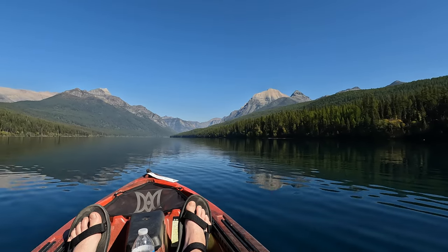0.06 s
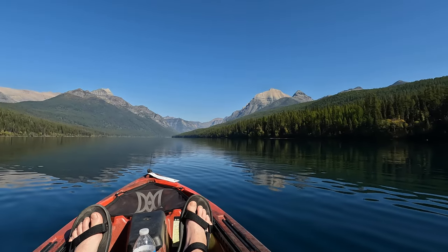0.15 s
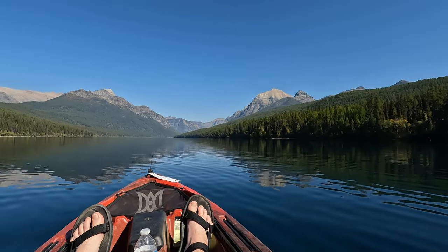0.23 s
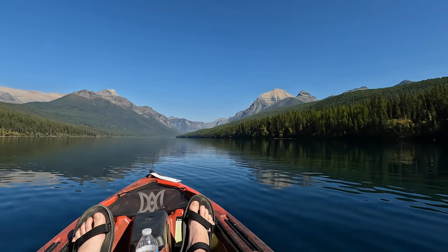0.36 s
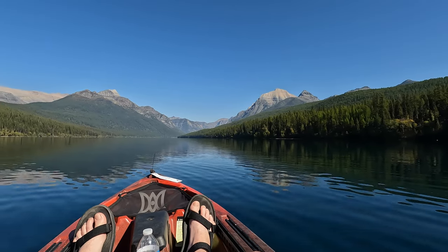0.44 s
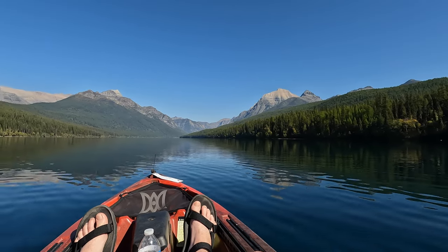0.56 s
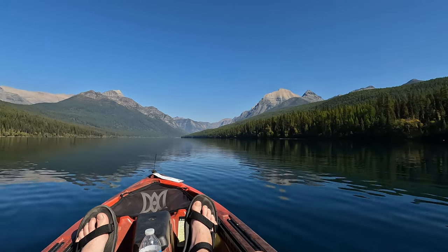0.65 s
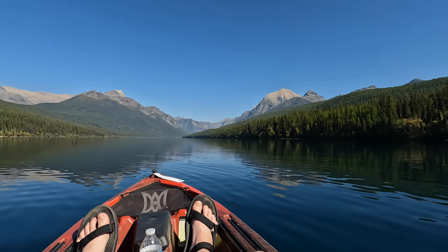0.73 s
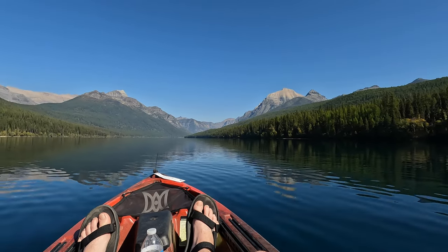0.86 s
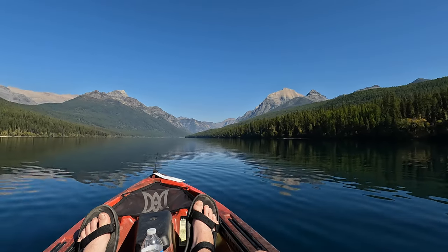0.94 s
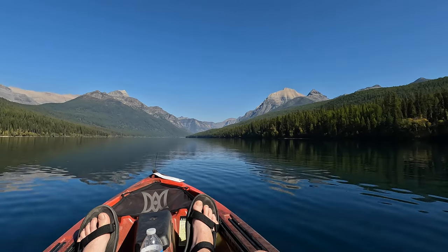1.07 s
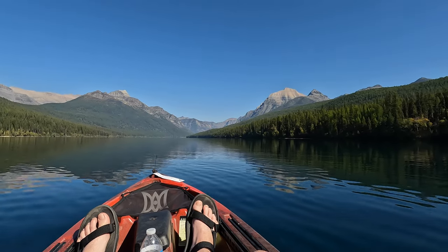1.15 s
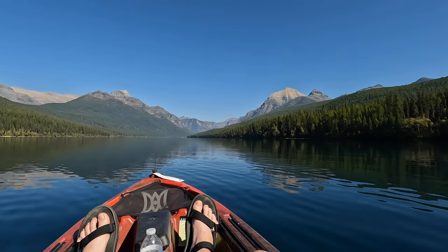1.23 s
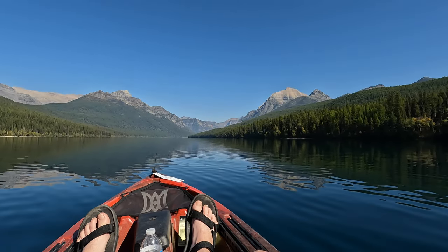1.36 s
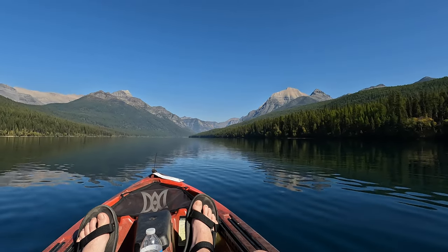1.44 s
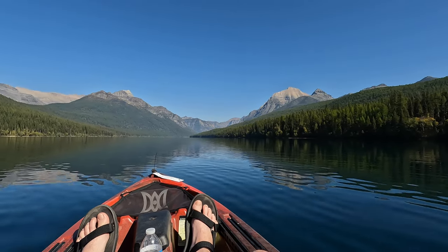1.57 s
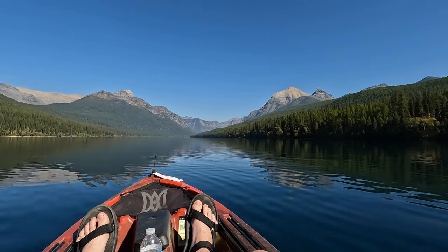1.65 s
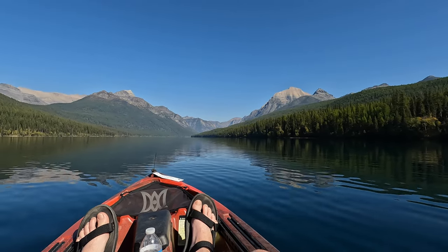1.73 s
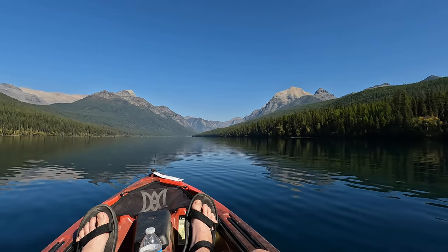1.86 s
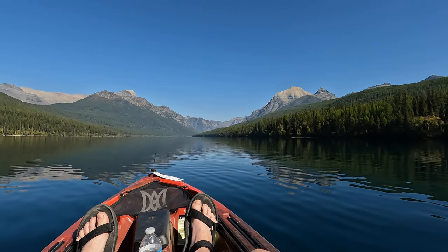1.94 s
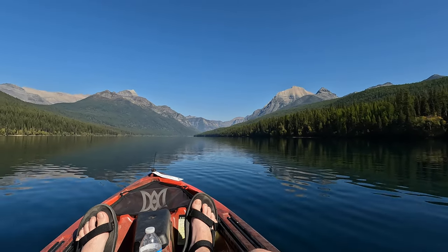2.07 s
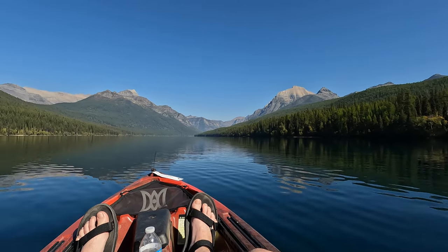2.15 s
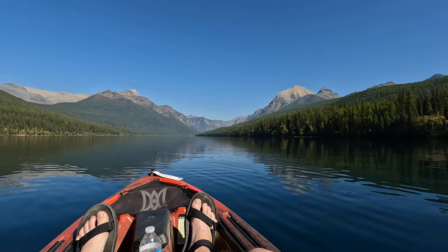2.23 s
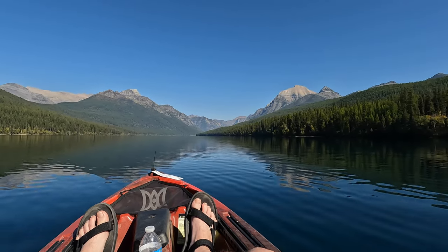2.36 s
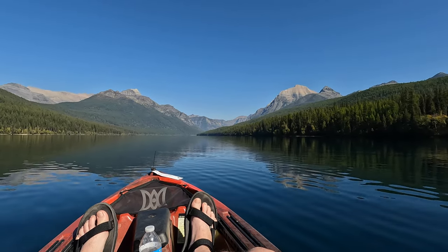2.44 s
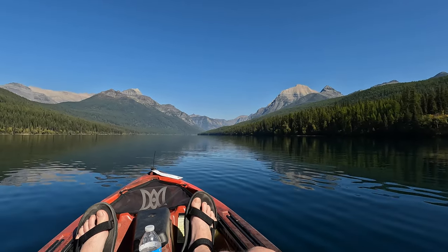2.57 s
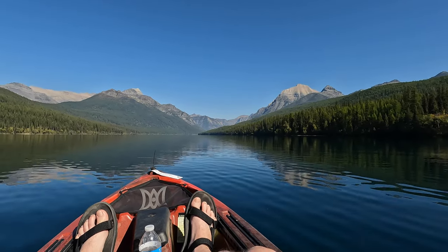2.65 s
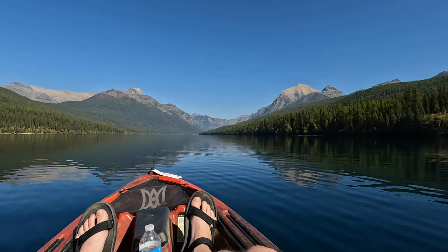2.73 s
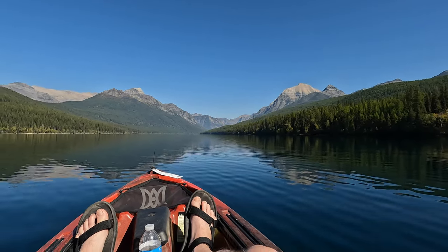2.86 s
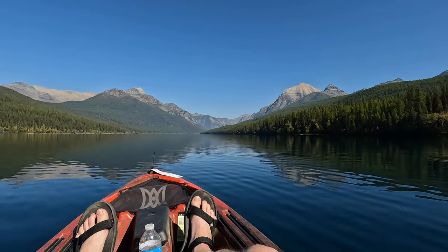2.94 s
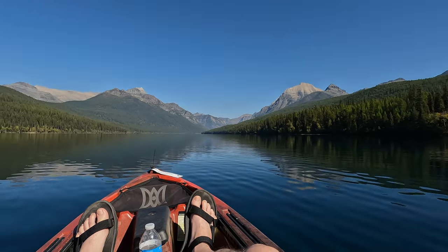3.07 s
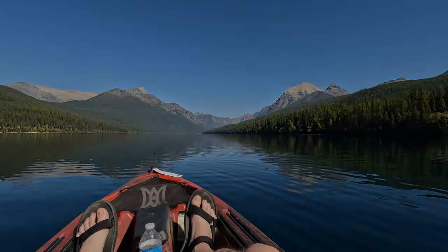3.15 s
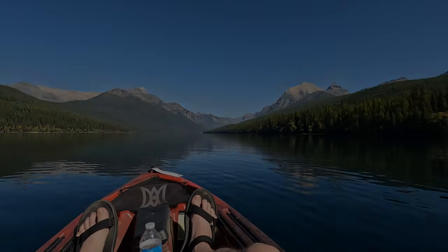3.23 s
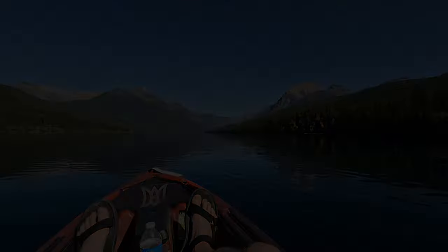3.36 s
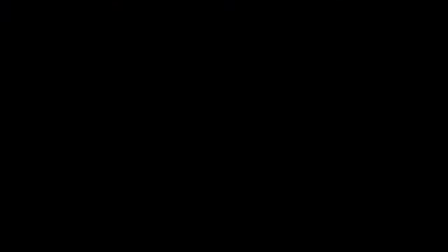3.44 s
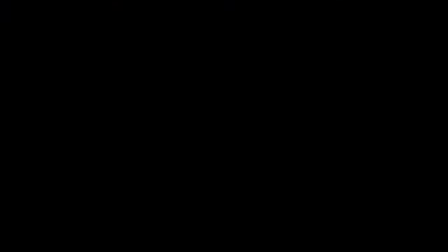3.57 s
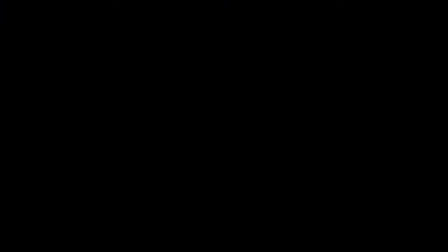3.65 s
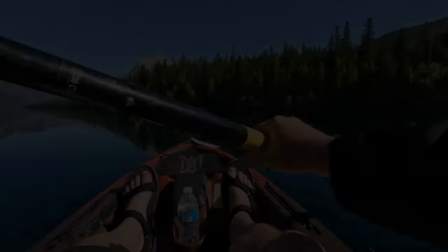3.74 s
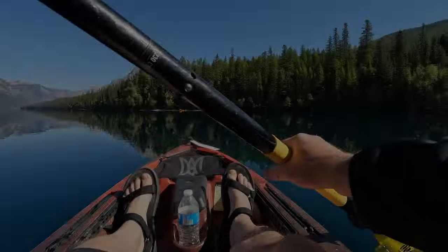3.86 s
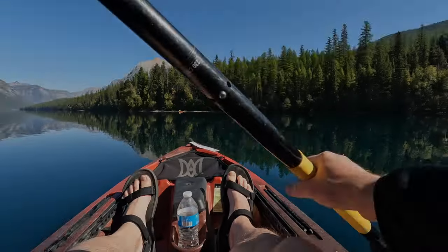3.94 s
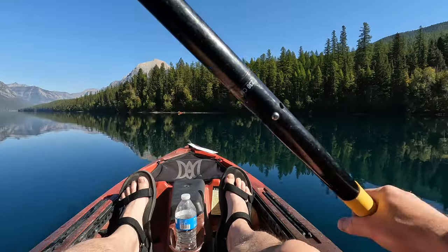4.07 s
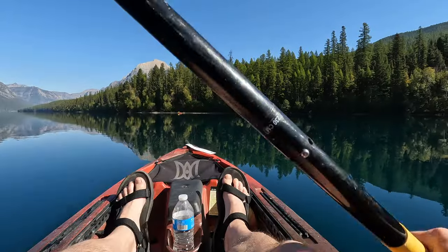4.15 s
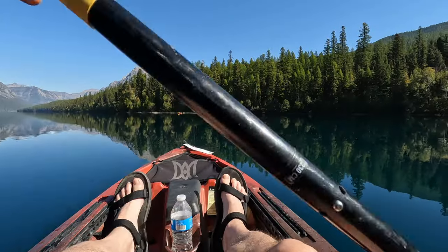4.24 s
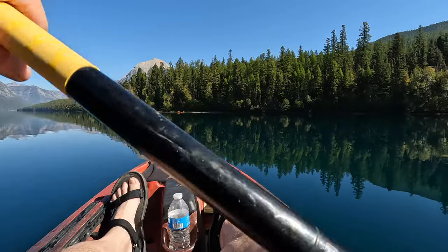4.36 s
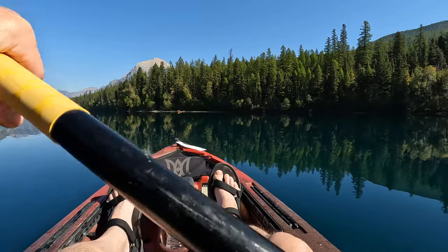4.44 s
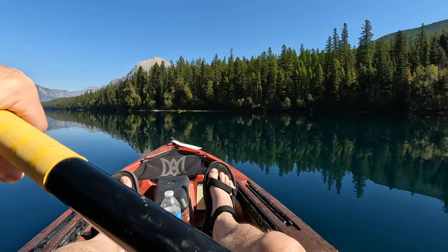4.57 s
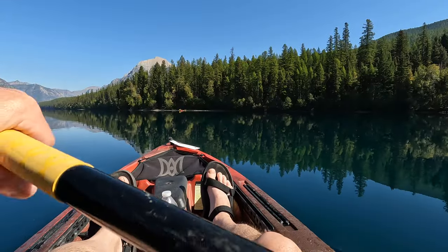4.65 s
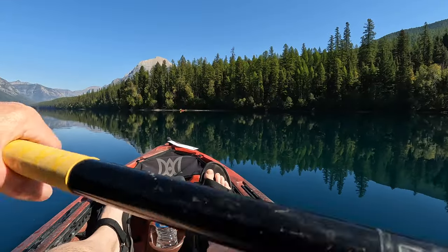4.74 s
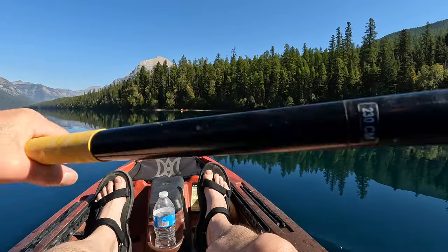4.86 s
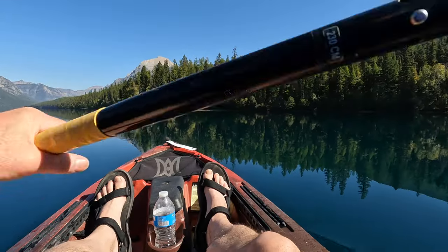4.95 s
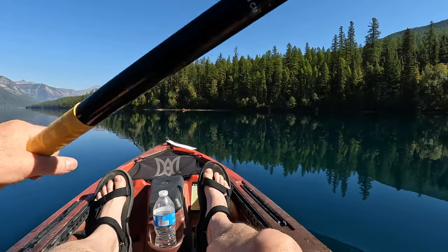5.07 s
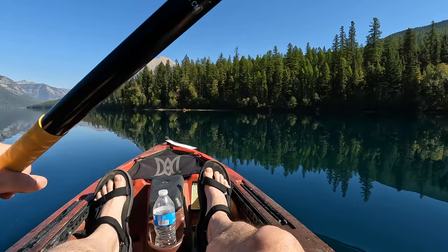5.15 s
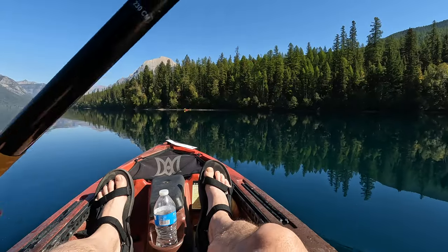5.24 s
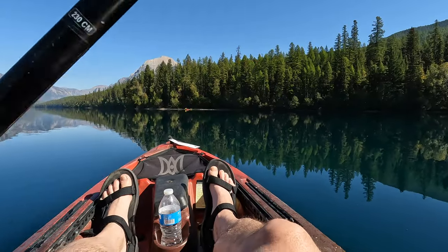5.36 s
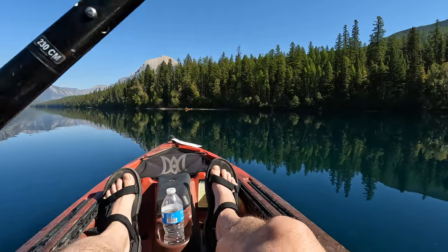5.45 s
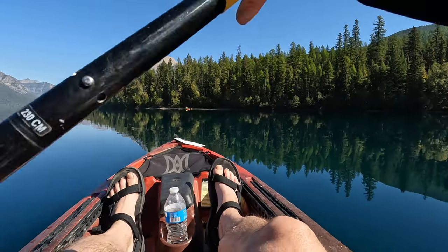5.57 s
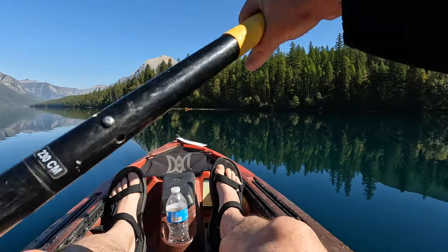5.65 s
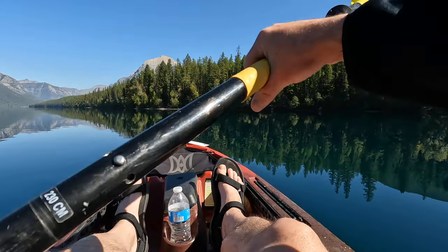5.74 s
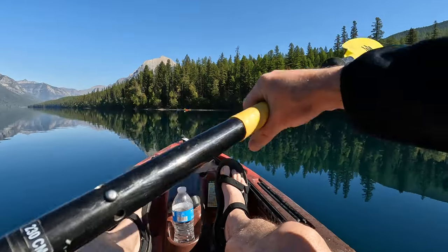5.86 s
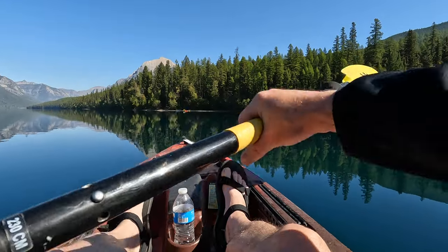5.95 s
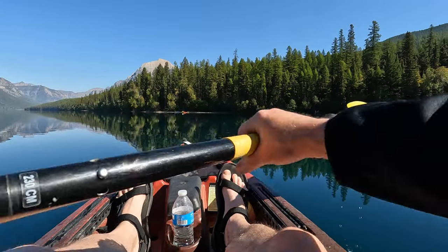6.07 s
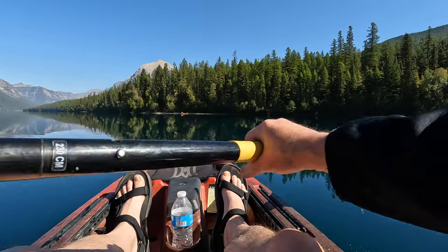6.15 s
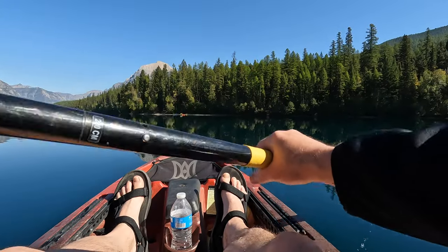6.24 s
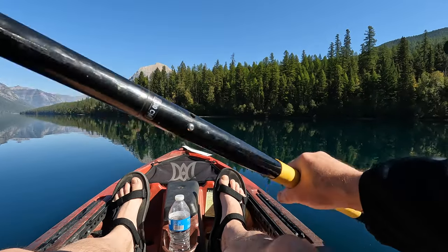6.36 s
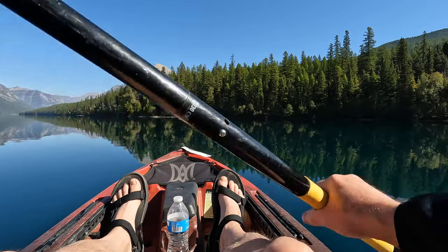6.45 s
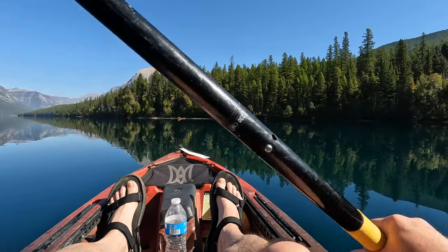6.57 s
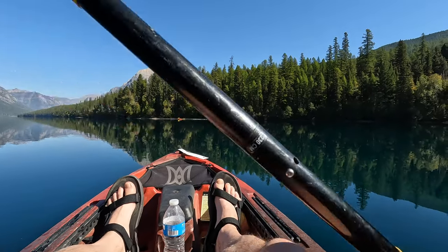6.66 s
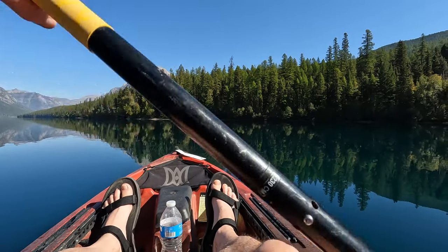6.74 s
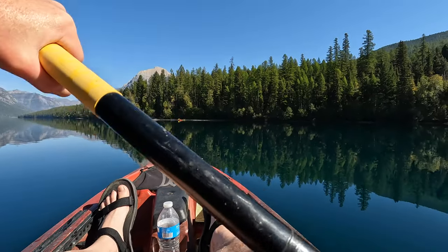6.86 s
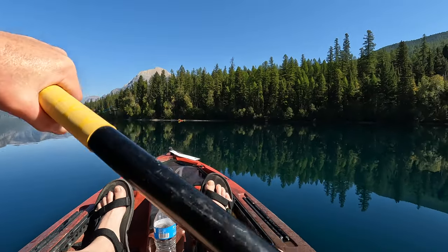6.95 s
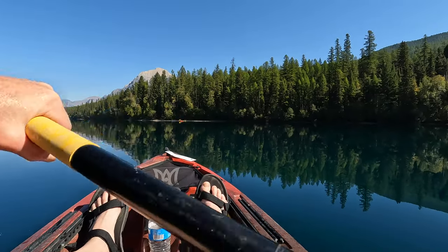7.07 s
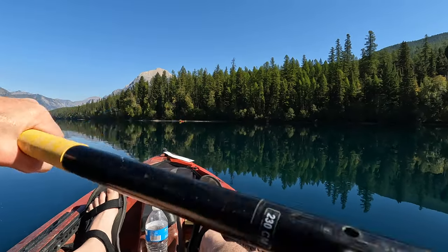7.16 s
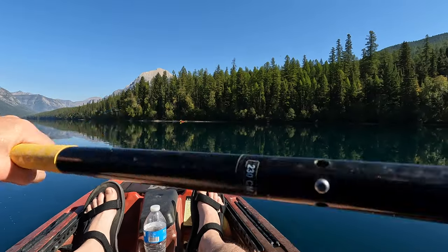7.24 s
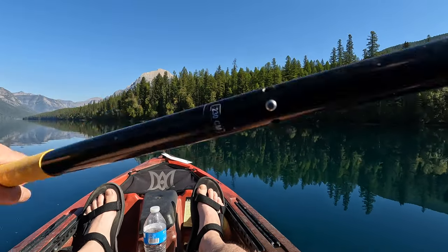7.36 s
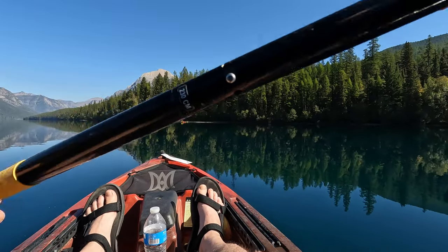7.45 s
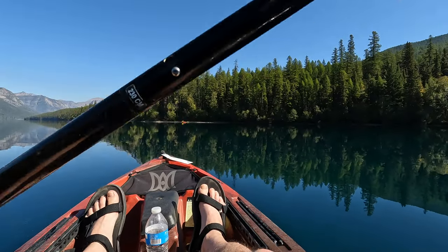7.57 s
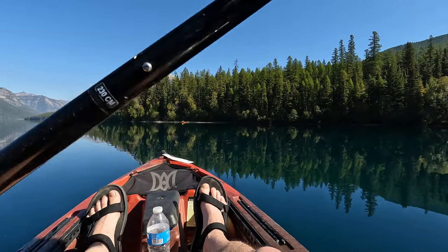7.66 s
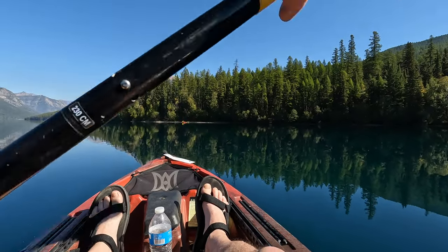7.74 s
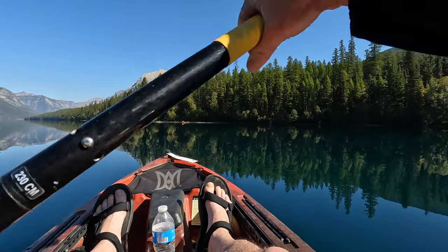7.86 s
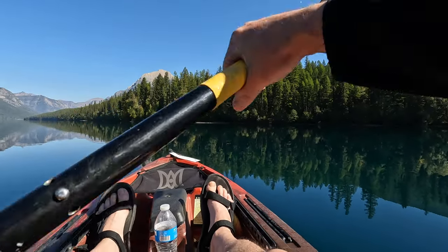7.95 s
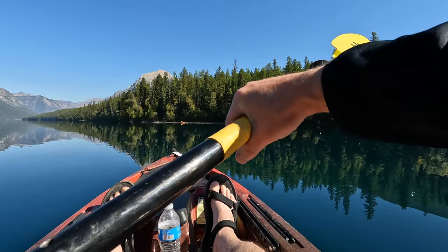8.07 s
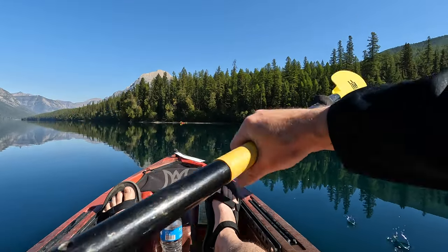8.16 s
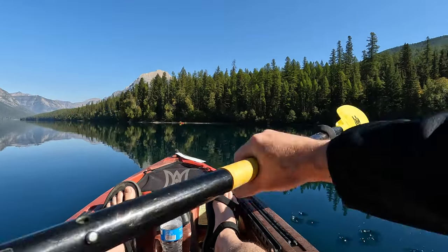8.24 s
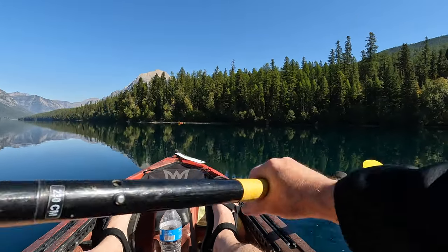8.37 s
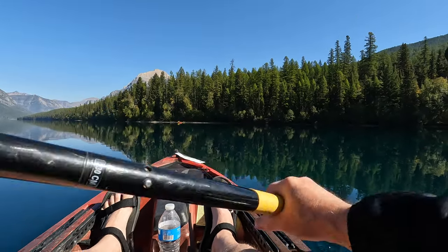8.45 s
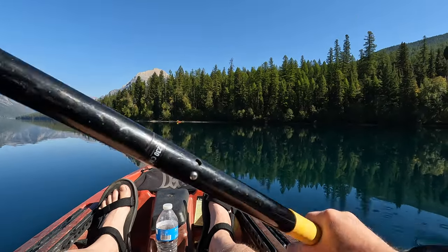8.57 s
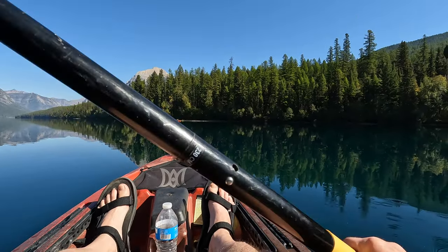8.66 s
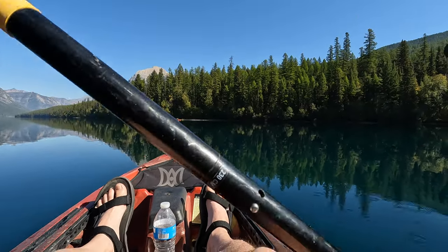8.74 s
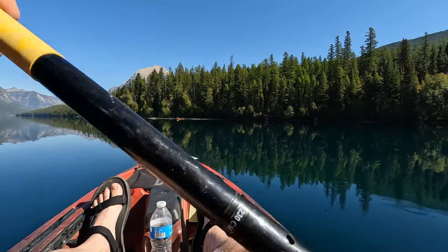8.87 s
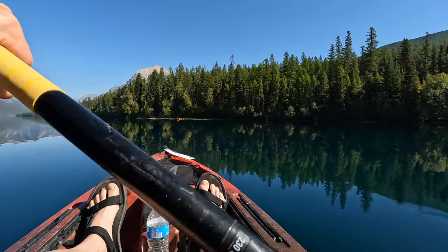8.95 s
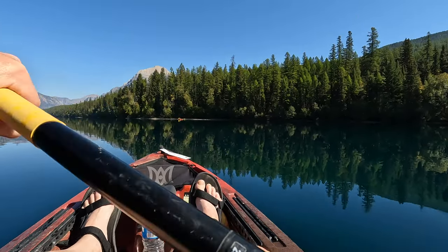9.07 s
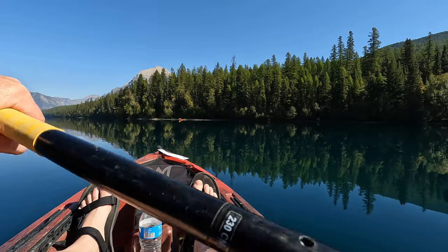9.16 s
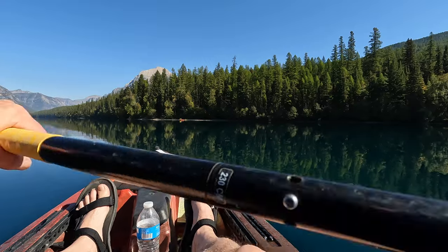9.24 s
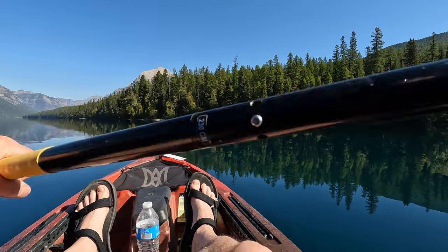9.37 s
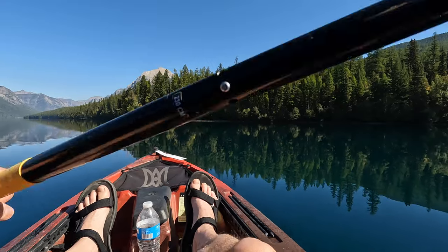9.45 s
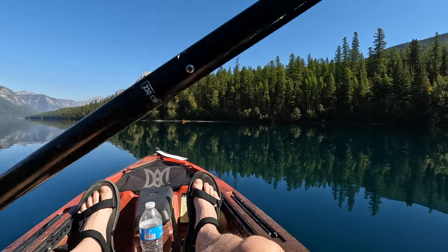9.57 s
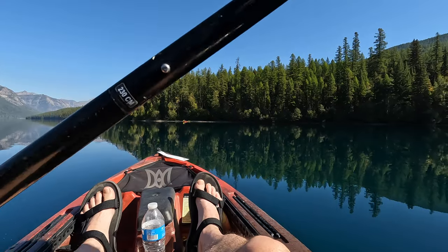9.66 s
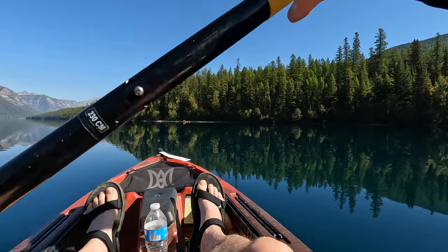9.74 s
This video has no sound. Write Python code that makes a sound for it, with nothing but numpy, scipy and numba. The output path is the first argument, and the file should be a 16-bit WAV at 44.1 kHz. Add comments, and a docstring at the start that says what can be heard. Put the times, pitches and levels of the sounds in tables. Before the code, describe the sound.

Close on a kayak seat on a calm open lake. Small ripples lap and fizz at the bow for a second, with tiny drops ticking, then near quiet with soft low wind rumble on the microphone. From about three and a half seconds, six paddle strokes follow, each a bubbly gulp, churning gurgle, splash and light spray, with running water between. The last is hardest, thumping the hull.

```python
"""On a calm lake, heard from the seat of a kayak. First it glides: ripples lap at the bow and drops tick on the water.
Then come six paddle strokes. Trapped air pockets ring as gulps, clouds of smaller bubbles over noise make the churn,
splash and spray, and short noise bursts make the slaps. Low noise and deep rings shake and thump the hull.
Moving air rumbles softly on the microphone, over the faint hush of the lake and a thin, very high hiss."""
import sys
import numpy as np
from scipy import signal
from scipy.fft import rfft, irfft, next_fast_len
from scipy.io import wavfile
from scipy.ndimage import uniform_filter1d
from numba import njit

SR = 44100
rng = np.random.default_rng(int(sys.argv[2]) if len(sys.argv) > 2 else 0)


def to_wav(s):
    """Save 16-bit WAV."""
    ch = np.atleast_2d(s).T  # columns
    pcm = np.round(np.clip(ch, -1, 1) * 32767)  # PCM
    wavfile.write(sys.argv[1], SR, pcm.astype(np.int16))


N = 432621
TIME = np.arange(N) / SR  # seconds

# Paddle strokes, from the moment the blade goes in: (time [s], length of pull [s], strength [dB],
# extra deep churn [dB], extra splash [dB], extra spray [dB], hull shudder [dB])
STROKES = [(3.45, 0.394, -3, -1.5, 0.5, -3.5, -57.5), (4.49, 0.367, -1, 2.5, 3, 1, -56),
           (5.72, 0.3476, -0.5, 1, 3.5, -0.5, -43.5), (6.99, 0.3605, 0.5, -4.5, 3.5, -1, -59.5),
           (7.95, 0.391, -1, 3, 2, 0, -58.5), (9.04, 0.401, 3.5, -2, 0, 0.5, -52)]
# Which side the blade sounds come from: (time [s], left minus right before the image is narrowed [dB])
BLADE_SIDE = [(3.3, -6), (4.1, 6), (5.7, -4), (6.1, 5.5), (6.7, 7), (7.2, 1), (7.7, 1), (7.95, 4),
              (8.3, 4.5), (8.7, 3.5), (9.1, -1.5), (9.5, -0.5), (9.8, 3)]
# Tone colour of the large bubbles below the blade: (frequency [Hz], level per Hz [dB])
CHURN_COLOUR = [(60, -50), (105, -15.5), (160, -4.5), (240, -1), (420, -0.5), (600, -4), (900, -29),
                (1600, -51.5)]
# Tone colour of the water sloshing at the surface: (frequency [Hz], level per Hz [dB])
SLOSH_COLOUR = [(350, -30.5), (600, -3), (900, -0.5), (1300, -4.5), (1700, -13.5), (2400, -20), (4000, -51)]
# Tone colour of the small bubbles in the splash: (frequency [Hz], level per Hz [dB])
SPLASH_COLOUR = [(800, -25.5), (1400, -1.5), (1900, -2), (2400, -3), (3300, -4), (4300, -19), (7000, -45)]
# Tone colour of the fine spray: (frequency [Hz], level per Hz [dB])
SPRAY_COLOUR = [(2400, -12.5), (3700, -0.5), (4500, 0), (5500, -1.5), (7500, -5), (10000, -12),
                (13000, -26), (15000, -44)]
# How the water answers a pull: (level [dB], delay after the blade goes in, negative is earlier [s],
# attack [s], release [s], level between pulls [dB])
DEEP_CHURN = (-41, 0, 0.15, 0.1076, -49)
SURFACE_SLOSH = (-44.5, 0.1265, 0.253, 0.1127, -51)
SPLASHING = (-52.5, -0.06, 0.3239, 0.0014, -54.5)
FINE_SPRAY = (-60, -0.08, 0.2, 0.2954, -61)


def paddle():
    """The blade gulps air, churns the water below, sloshes the surface, splashes and throws spray."""
    _, _, strength_db, depth_db, splash_db, spray_db, _ = np.transpose(STROKES)
    # large bubbles are few and ring alone; small ones are many and merge into a hiss
    large = cloud(CHURN_COLOUR, rate=170, cycles=2.8, spread_db=3, wash_db=-7, scatter=.06)
    medium = cloud(SLOSH_COLOUR, rate=400, cycles=3.8, spread_db=3, wash_db=-5, scatter=.19)
    small = cloud(SPLASH_COLOUR, rate=1000, cycles=5, spread_db=3.4, wash_db=-2, scatter=.26)
    fine = cloud(SPRAY_COLOUR, rate=1800, cycles=2.2, spread_db=4, wash_db=-1, scatter=.27)
    # quick spurts and slower surges, shared by all layers but the deep churn
    spurts = undb(0.964 * waver(70) + 1.535 * waver(12))
    gurgling, hissing = wake(0), wake(1)
    churn = stirred(DEEP_CHURN, strength_db + depth_db, gurgling) * large
    slosh = stirred(SURFACE_SLOSH, strength_db, gurgling) * medium
    splash = stirred(SPLASHING, strength_db + splash_db, hissing) * small
    spray = stirred(FINE_SPRAY, strength_db + spray_db, hissing) * fine
    blade = churn + spurts * (slosh + splash + spray) + gulps()
    return blade * pan(curves(BLADE_SIDE)[0])


# The loudest air pockets at the blade: (time [s], starting pitch [Hz], level before gain_db [dB], decay [s])
GULPS = [(3.491, 498.5, -31.5, 0.0061), (3.526, 887, -30, 0.0031), (3.530, 435.6, -33, 0.0116),
         (3.616, 394.7, -32.5, 0.0087), (3.639, 975, -18.5, 0.0022), (3.68, 171.4, -35, 0.0275),
         (3.857, 733, -20.5, 0.0078), (3.881, 423.2, -26.5, 0.0105), (3.926, 848, -27.5, 0.00285),
         (4.118, 289.3, -22.5, 0.00114), (4.127, 384.5, -35, 0.0111), (4.313, 1292, -31, 0.00377),
         (4.4364, 1206, -32, 0.0022), (4.476, 1235, -32.5, 0.00475), (4.505, 437.4, -26.5, 0.01),
         (4.511, 243, -26.5, 0.0248), (4.56, 128.4, -34.5, 0.0266), (4.599, 841.4, -32.5, 0.0096),
         (4.650, 1267, -20, 0.00232), (4.741, 294, -25, 0.00099), (4.795, 416, -33, 0.0357),
         (4.835, 268.7, -28, 0.0304), (4.856, 884, -34.5, 0.0193), (4.880, 795, -31, 0.0063),
         (5.231, 790, -30.5, 0.00367), (5.787, 239, -31, 0.026), (5.8324, 1600, -26, 0.00077),
         (5.887, 452.5, -26.5, 0.0158), (5.8996, 900, -23, 0.0022), (6.047, 443.2, -22, 0.01),
         (6.109, 910, -31.5, 0.0058), (6.120, 1143, -32.5, 0.0058), (6.134, 968, -33.5, 0.0057),
         (6.252, 830, -29, 0.0033), (6.286, 363.7, -35.5, 0.0099), (6.312, 1007, -35.5, 0.0048),
         (6.553, 984, -38.5, 0.0057), (7.002, 1272, -26.5, 0.0058), (7.015, 258.2, -20.5, 0.0055),
         (7.035, 344, -21, 0.0036), (7.0475, 2180, -29, 0.00186), (7.048, 1274, -22.5, 0.00154),
         (7.069, 982, -30, 0.0075), (7.151, 199.7, -29, .014), (7.234, 438, -29, 0.0092),
         (7.249, 749, -19.5, 0.00786), (7.295, 433, -29, 0.0223), (7.320, 398.3, -30.5, 0.02),
         (7.409, 847.6, -27, 0.0114), (7.4545, 600, -29, 0.0021), (7.5006, 972, -33.5, 0.0034),
         (7.586, 725, -36, 0.014), (7.7024, 870, -37, 0.0182), (7.771, 438, -28, 0.0031),
         (7.775, 199.4, -28.5, 0.013), (7.790, 897, -25.5, 0.00395), (7.973, 334, -31, 0.0277),
         (8.028, 404.8, -32, 0.0262), (8.0294, 1474, -28.5, 0.00101), (8.113, 364.5, -24, 0.0079),
         (8.212, 663.8, -23, 0.00514), (8.213, 310.8, -19, 0.0042), (8.230, 211.4, -31.5, 0.0248),
         (8.573, 854.5, -30, 0.00276), (8.863, 997, -34, 0.0047), (8.9358, 1217, -25.5, 0.00175),
         (8.9665, 444, -24, 0.00207), (8.968, 1215, -30, 0.00174), (8.9957, 1442, -33, .005),
         (9.051, 604, -23, 0.0045), (9.064, 549, -18.5, 0.00594), (9.0644, 924, -13, 0.00086),
         (9.064, 1373, -18, 0.0028), (9.081, 601, -25.5, 0.0114), (9.079, 928, -18.5, 0.0037),
         (9.095, 288, -20, 0.0016), (9.1268, 948.5, -24.5, 0.0044), (9.144, 211.4, -28, 0.014),
         (9.224, 299.3, -27, 0.034), (9.2679, 1740, -28.5, 0.00227), (9.298, 464.9, -29, 0.0242),
         (9.320, 372, -18, 0.0129), (9.4425, 579, -26.5, 0.0071), (9.523, 596, -29, 0.00575)]
GULP_SWELL_CYCLES = 1.3  # a pocket reaches full swing in about one cycle
GULP_RISE_PER_S = 4.365  # relative pitch rise as it nears the surface
# Fainter pockets come by chance
STRAY_PER_S = 14
STRAY_LOW_HZ, STRAY_HIGH_HZ, STRAY_CYCLES = 421.4, 1925, 5.05  # pitch range; average decay in cycles
# basic level before the wake and gain_db; added during a pull; from weakest to strongest
STRAY_DB, STRAY_PULL_DB, STRAY_RANGE_DB = -47, 8.5, 5.5


def gulps(gain_db=1.54):
    """Trapped air rings and glides up: a few loud pockets, and faint ones that grow with the pull."""
    when, pitch, life, size = rng.random((int(STRAY_PER_S * N / SR), 4)).T
    at = (when * N).astype(int)
    _, lag, attack, release, _ = DEEP_CHURN
    pulling = pulls(np.zeros(len(STROKES)), lag, attack, release)[at]
    stray_hz = STRAY_LOW_HZ * (STRAY_HIGH_HZ / STRAY_LOW_HZ) ** pitch
    gurgling_db = curves(WAKE)[0][at]
    stray_db = STRAY_DB + STRAY_PULL_DB * pulling + gurgling_db + STRAY_RANGE_DB * (size - .5)
    stray_decay = STRAY_CYCLES * (.5 + life) / stray_hz
    strays = np.column_stack([TIME[at], stray_hz, stray_db, stray_decay])
    strays = strays[TIME[at] > WAKE[0][0]]  # none before the paddling starts
    s, hz, db, decay = np.vstack([GULPS, strays]).T
    pockets = bubbles(s, hz, db + gain_db, GULP_SWELL_CYCLES / hz, decay, GULP_RISE_PER_S, scatter=0.0486)
    return splatter(pockets, tail_s=0.01424, tail_db=-6.0)


def pulls(levels_db, lag, attack, release):
    """One swell for each stroke, at the given levels."""
    swells = [undb(db) * envelope(stroke[0] + lag, attack, stroke[1], release)
              for stroke, db in zip(STROKES, levels_db)]
    return sum(swells)


def stirred(response, strokes_db, running):
    """Gain of one kind of water noise: the pulls on top of the running wake."""
    db, lag, attack, release, wake_db = response
    pulled = undb(db) * pulls(strokes_db, lag, attack, release)
    return np.hypot(pulled, undb(wake_db) * running)


# Water that keeps running along the hull between pulls, relative levels:
# (time [s], gurgling [dB], hiss [dB])
WAKE = [(3.16, -27.5, -26.5), (3.42, -0.5, -3.5), (3.65, 1, 0), (4.05, -1.5, 3.5), (4.28, -2, 1),
        (4.45, 1, -1), (5.03, 0, 1.5), (5.17, 0.5, 0), (5.4, -1, 0), (5.62, 5, 2), (6.3, 1, -3.5),
        (6.58, -5, -3), (6.85, 2, 1.5), (7.35, 4.5, 0.5), (7.62, -2.5, 2), (7.9, 4.5, -1.5), (8.6, -3, 0),
        (8.92, 4.5, 4.5), (9.6, 0.5, 7.5), (9.81, 4, 0)]


def wake(column):
    """Gain of the water running along the hull, gurgling (0) or hissing (1); silent until paddling starts."""
    fade_in = np.clip((TIME - WAKE[0][0]) / .1, 0, 1)
    return undb(curves(WAKE)[column]) * fade_in


# The hull is bumped and rocks: (time of full level [s], level [dB], release [s])
BUMPS = [(4.12, -49, 0.041), (4.56, -53.5, .06), (5.2, -50.5, 0.296), (7.55, -45.5, .25),
         (9.22, -39, 0.028), (9.79, -48, .2)]
# A hard stroke shoves the water and the hull: (time [s], pitch [Hz], level [dB], swell [s], decay [s],
# relative pitch rise [1/s])
SHOVES = [(9.04, 28.2, -16.5, 0.0045, 0.0343, 0), (9.051, 81, -25.5, 0.0068, 0.014, 0)]
# Tone colour of the shaking hull: (frequency [Hz], level per Hz [dB])
SHUDDER_COLOUR = [(25, -12), (60, 4.5), (90, -0.5), (120, -2.5), (170, -37.5), (400, -80)]
SHUDDER_ATTACK_S, SHUDDER_RELEASE_S, SHUDDER_WAKE_DB = 0.106, .1, -59
BUMP_ATTACK_S = 0.057


def hull():
    """Each pull shakes the boat, bumps rock it, and a hard last stroke thumps it, more on the right."""
    pulled = pulls(np.transpose(STROKES)[-1], 0, SHUDDER_ATTACK_S, SHUDDER_RELEASE_S)
    rocked = sum(undb(db) * envelope(s - BUMP_ATTACK_S, BUMP_ATTACK_S, BUMP_ATTACK_S, release)
                 for s, db, release in BUMPS)
    gain = np.hypot(pulled + rocked, undb(SHUDDER_WAKE_DB) * wake(0))
    shudder = gain * unit(colour(noise(0.45), SHUDDER_COLOUR))
    thump = bubbles(*np.transpose(SHOVES)) * pan(-6.5)
    return shudder + thump


# Flat slaps of water on blade and hull: (time [s], level before gain_db [dB],
# bright edge relative to the body [dB], decay [s])
SLAPS = [(1.018, -51, -15, 0.0183), (2.155, -47.5, -6.5, 0.0124), (3.632, -38, -26.5, 0.0112),
         (3.849, -31.5, -15, 0.0126), (4.117, -38.5, -9.5, .021), (4.670, -35.5, -29.5, 0.039),
         (4.880, -28, -33, 0.0042), (5.287, -29.5, -9, 0.0102), (6.030, -37, -21.5, 0.065),
         (6.996, -32.5, -30.5, 0.0134), (7.024, -22.5, -29, 0.00746), (7.232, -32, -34.5, 0.0276),
         (7.772, -31, -10, 0.0208), (8.215, -31.5, -11.5, 0.0044), (8.751, -25.5, -19, 0.00776),
         (8.966, -31, -15.5, 0.0039), (9.048, -21.5, -34.5, 0.0063), (9.061, -28, -35, 0.0225),
         (9.122, -29, -33, 0.0667), (9.355, -33.5, -8, 0.054), (9.441, -25.5, -18.5, 0.009),
         (9.788, -30.5, -7.5, 0.033)]
# Tone colour of the body of a slap: (frequency [Hz], level per Hz [dB])
SLAP_COLOUR = [(150, -2), (400, 6), (1600, 8), (3500, -3), (5000, -8), (7000, -34), (14000, -39)]
SLAP_SWELL_SHARE = 0.166  # rise time as a share of the decay


def slaps(gain_db=-7):
    """Sheets of water hit flat: short bursts of noise, some with a bright edge."""
    body, edge = np.zeros((2, N))
    for s, db, treble_db, decay in SLAPS:
        swell = SLAP_SWELL_SHARE * decay
        burst = undb(db + gain_db) * envelope(s, swell, swell, decay)
        body += burst
        edge += burst * undb(treble_db)
    dull = unit(colour(noise(0.37), SLAP_COLOUR))
    bright = unit(colour(noise(0.79), [(2500, -15), (6000, 2), (14000, -19.5)]))
    return body * dull + edge * bright


# Wavelets that break on the bow, levels before trimming:
# (time of the crest [s], lapping [dB], gurgle [dB], fizz [dB])
RIPPLES = [(0.038, -68, -80, -63.5), (0.272, -60, -73.5, -66.5), (.43, -52.5, -74.5, -70.5),
           (.585, -60.5, -62, -63.5), (.70, -60, -63.5, -68.5), (.825, -51, -75, -67),
           (.905, -56, -69.5, -64.5), (1.036, -71.5, -66, -67.5), (1.11, -70, -79, -77)]
# Tone colour of the gurgle: (frequency [Hz], level per Hz [dB])
GURGLE_COLOUR = [(200, -27), (330, -4), (500, -5), (700, -6.5), (1100, -32.5)]
# Tone colour of the lapping: (frequency [Hz], level per Hz [dB])
LAP_COLOUR = [(400, -23), (780, -12), (980, -0.5), (1750, -6.5), (2300, -12), (4000, -37)]
# Tone colour of the fizz: (frequency [Hz], level per Hz [dB])
FIZZ_COLOUR = [(1800, -19.5), (3400, -4.5), (5500, -2.5), (7500, 0), (9500, -13), (12000, -15.5),
               (14000, -35.5)]
RIPPLE_ATTACK_S, RIPPLE_RELEASE_S = 0.0598, 0.0678


def bow():
    """Small ripples break on the bow and die away; their lapping and fizz lie to the left."""
    s, lap_db, gurgle_db, fizz_db = np.transpose(RIPPLES)
    waves = np.array([envelope(crest - RIPPLE_ATTACK_S, RIPPLE_ATTACK_S, RIPPLE_ATTACK_S, RIPPLE_RELEASE_S)
                      for crest in s])
    deep = cloud(GURGLE_COLOUR, rate=98, cycles=3.1, spread_db=3.5, wash_db=-8, scatter=0.608)
    middle = cloud(LAP_COLOUR, rate=360, cycles=4.1, spread_db=6.5, wash_db=-4, scatter=0.67)
    crackle = cloud(FIZZ_COLOUR, rate=1300, cycles=3, spread_db=4.5, wash_db=-6, scatter=.4)
    gurgle = undb(gurgle_db - 2.0) @ waves * deep
    lap = undb(lap_db - 1.5) @ waves * middle * pan(4.8)
    fizz = undb(fizz_db + 2.0) @ waves * crackle * pan(15.2)
    return gurgle + lap + fizz


# Bubbles in the bow wave: (time [s], starting pitch [Hz], level before trimming [dB], decay [s])
PLIPS = [(0.0593, 2000, -55, 0.0048), (.2799, 3710, -51.5, 0.00093), (0.3749, 1004, -49, 0.00175),
         (.434, 1975, -45.5, 0.0017), (.454, 1112, -54.5, .0024), (0.5845, 1567, -38, 0.00128),
         (.5872, 496, -54, 0.0087), (.6356, 1301, -56.5, 0.0065), (.7034, 1290, -55, 0.0042),
         (0.7457, 1270, -48, 0.0053), (0.7748, 1226, -47, 0.00207), (0.8285, 1617, -35.5, 0.0015),
         (.864, 1765, -38.5, 0.00098), (0.8798, 1048, -41.5, 0.00184), (0.9186, 1236, -41.5, 0.00146),
         (0.9496, 1470, -55, 0.00285), (1.1025, 1246, -56.5, .003), (3.263, 1590, -45.5, 0.0027)]
# Drops falling from the paddle: (time [s], level before trimming [dB], starting pitch [Hz])
DROPS = [(.0628, -59, 6310), (.1136, -52.5, 6960), (.178, -55, 6900), (.3695, -52.5, 5200),
         (.4808, -49, 4400), (.5107, -44.5, 5880), (.5837, -47.5, 5160), (.8006, -42.5, 7160),
         (.834, -46.5, 5010), (.9053, -47.5, 7140), (.9373, -42.5, 5660), (1.0226, -44.5, 5060),
         (1.0765, -46.5, 6800), (1.0969, -52.5, 7500), (1.4265, -55.5, 3650), (1.53, -47.5, 5330),
         (1.6382, -54.5, 5670), (2.2872, -56.5, 7320), (3.68, -39, 5600), (7.4914, -40, 4730),
         (9.674, -35, 5080)]


def drips():
    """Bubbles plip in the bow wave; falling drops ring tiny ones that fade within milliseconds."""
    s, hz, db, decay = np.transpose(PLIPS)
    plips = bubbles(s, hz, db + .5, swell=0.00128, decay=decay, rise=8.7, scatter=0.156) * pan(12.0)
    s, db, hz = np.transpose(DROPS)
    drops = bubbles(s, hz, db - .5, swell=0.00015, decay=0.000563, rise=21, scatter=0.165) * pan(28)
    return splatter(plips + drops, tail_s=0.0042, tail_db=-3.5)


# Drops that land on something hard: (time [s], level before colouring [dB])
TICKS = [(.586, -55), (.937, -55), (1.530, -54.5), (2.015, -58.5), (2.289, -58.5), (5.289, -45),
         (6.428, -53.5), (6.934, -54), (7.402, -45.5), (7.630, -50), (7.776, -46), (8.229, -40),
         (8.370, -42), (8.5, -52)]


def ticks(decay_s=0.00042, faint_rate=22, faint_db=-80, spread_db=4.0):
    """Drops on hard surfaces click dry and bright; many faint ones patter between them."""
    s, db = np.transpose(TICKS)
    when, size = rng.random((int(faint_rate * N / SR), 2)).T
    hits = np.zeros(N)
    hits[(when * N).astype(int)] = undb(faint_db - spread_db * np.log(1 - .98 * size))
    hits[(s * SR).astype(int)] = undb(db)
    t = TIME[:SR // 100] / decay_s
    click = t * np.exp(1 - t)
    bursts = signal.fftconvolve(hits, click)[:N] * noise(0.87)
    bright = [(2500, -25), (5000, -2.5), (7300, 3), (10000, 4.5), (13500, -5), (15500, -18.5)]
    return colour(bursts, bright) * pan(9.4)


# Level of the highest treble, before it flickers: (time [s], level [dB])
TOP_HISS_LEVEL = [(3.85, -94.5), (4.1, -73.5), (4.4, -79.5), (4.7, -73), (5.0, -78), (5.9, -72), (6.7, -76),
                  (7.4, -77.5), (8.3, -70.5), (8.6, -72.5), (9.3, -70), (9.81, -73)]
# Tone colour of the highest treble: (frequency [Hz], level per Hz [dB])
TOP_HISS_COLOUR = [(6500, -35), (9000, -19), (11000, 2.5), (13000, 4.5), (13900, 0.5), (14600, -15),
                   (15500, -24.5)]


def top_hiss():
    """A thin, very high hiss on the left starts after the first stroke, swells and flickers."""
    started = TIME > TOP_HISS_LEVEL[0][0]
    gain = undb(curves(TOP_HISS_LEVEL)[0] + 2.27 * waver(25)) * started
    return gain * unit(colour(noise(1), TOP_HISS_COLOUR)) * pan(12.4)


# Moving air on the microphone, before random gusts: (time [s], level [dB])
WIND = [(0, -68), (.19, -53.5), (.32, -70.5), (.7, -66.5), (.87, -45.5), (1.16, -39), (1.45, -50),
        (1.85, -43), (2.35, -58), (2.8, -48), (3.3, -52), (3.7, -43), (4.45, -49), (5.6, -50.5),
        (5.87, -37), (6.2, -42.5), (6.4, -53.5), (6.9, -48), (7.2, -44), (7.9, -39.5), (8.2, -54),
        (8.53, -40), (9.45, -39.5), (9.81, -46.5)]
# Tone colour of the moving air: (frequency [Hz], level per Hz [dB])
RUMBLE_COLOUR = [(8, -4.5), (20, -1), (28, -4.5), (42, -14), (60, -29.5), (100, -47), (200, -58),
                 (500, -99)]
# Tone colour of a short hissing puff: (frequency [Hz], level per Hz [dB])
PUFF_COLOUR = [(60, 10.5), (170, 8), (400, -12), (2000, -16), (6500, -19.5), (7300, 1), (9300, -14.5),
               (10100, -39), (14000, -37)]
# Tone colour of the hush of the lake: (frequency [Hz], level per Hz [dB])
LAKE_COLOUR = [(40, -5), (100, -8.5), (165, -3.5), (300, -1.5), (600, -9), (1700, -14), (2400, -20),
               (5000, -21), (6500, -20), (7400, -17.5), (9500, -25), (12000, -37.5), (13200, -38),
               (15000, -51)]
# Tone colour of the low murmur: (frequency [Hz], level per Hz [dB])
MURMUR_COLOUR = [(90, -25), (150, 6.5), (200, 7), (280, -5), (500, -43.5)]
GUST_DB, GUSTS_PER_S = 1.5, 9
PUFF_S, PUFF_DB, PUFF_ATTACK_S, PUFF_LENGTH_S, PUFF_RELEASE_S = 1.0673, -53, 0.111, 0.2297, 0.0356
LAKE_DB = -72.5


def air():
    """Slow eddies on the microphone, one hissing puff, and the hush of the lake with a wavering low murmur."""
    wind_gain = undb(curves(WIND)[0] + GUST_DB * waver(GUSTS_PER_S))
    rumble = wind_gain * unit(colour(noise(0.53), RUMBLE_COLOUR)) * pan(-7.5)
    puff_gain = undb(PUFF_DB) * envelope(PUFF_S, PUFF_ATTACK_S, PUFF_LENGTH_S, PUFF_RELEASE_S)
    puff = puff_gain * unit(colour(noise(1.0), PUFF_COLOUR))
    hush = undb(LAKE_DB) * unit(colour(noise(1.0), LAKE_COLOUR))
    murmur_db, = curves([(0, -80), (1.4, -72), (2.2, -79.5), (2.5, -71.5), (3.2, -72.5)])
    murmur = undb(murmur_db + 2.2 * waver(16)) * unit(colour(noise(1.0), MURMUR_COLOUR)) * pan(-8)
    return rumble + puff + hush + murmur


def cloud(spectrum, rate, cycles, spread_db, wash_db, scatter):
    """Many bubbles of mixed sizes (rate per second) over a wash of turbulence, at an rms of 1."""
    hz, db = np.transpose(spectrum)
    heard = hz[db > db.max() - 20]  # bubbles only where the colour is strong
    when, pitch, size, life, depth = rng.random((int(rate * N / SR), 5)).T
    hz = heard[0] * (heard[-1] / heard[0]) ** pitch
    # small bubbles die sooner; their extra height evens out the spectrum before it is coloured
    decay = cycles * (.5 + life) / hz
    db = -spread_db * np.log(1 - .98 * size) + 10 * np.log10(hz / heard[0])
    # most bubbles glide up towards the surface, a few are dragged down
    rise = 0.0852 * (depth - .2) / decay
    swell = decay * (0.163 + 0.51 * life)
    grains = unit(colour(bubbles(when * N / SR, hz, db, swell, decay, rise, scatter), spectrum))
    wash = unit(colour(noise(2 * scatter), spectrum))
    return unit(grains + undb(wash_db) * wash)


def bubbles(s, hz, db, swell, decay, rise, scatter=0):
    """Ring a set of bubbles, scattered from left to right."""
    rows = np.column_stack(np.broadcast_arrays(
        s, hz, undb(db), np.abs(swell), np.maximum(decay, 1 / SR), rise))
    left_share = np.clip(.5 + scatter * rng.standard_normal(len(rows)), 0, 1)
    return ring(rows, left_share)


@njit
def ring(rows, left_share):
    """Each bubble swells, then rings down while its pitch glides (up if rise is positive)."""
    out = np.zeros((2, N))
    for k in range(len(rows)):
        s, hz, size, swell, decay, rise = rows[k]
        start = max(int(s * SR), 0)
        for i in range(min(int((swell + 6 * decay) * SR), N - start)):
            t = i / SR
            swing = t / swell if t < swell else np.exp((swell - t) / decay)
            v = 2 * size * swing * np.sin(2 * np.pi * hz * t * (1 + rise * t / 2))
            out[0, start + i] += v * left_share[k]
            out[1, start + i] += v * (1 - left_share[k])
    return out


def splatter(x, tail_s, tail_db):
    """Hull and water surface throw each sound back as a short, uneven tail."""
    t = np.arange(SR // 8) / SR
    common, own = rng.standard_normal(len(t)), rng.standard_normal((2, len(t)))
    fade = np.exp(-t / tail_s) * (1 - np.exp(-t / 0.0048))
    tail = (common + 0.137 * own) * fade
    tail /= np.linalg.norm(tail[0])
    return x + undb(tail_db) * signal.fftconvolve(x, tail, axes=1)[:, :N]


def envelope(start, attack, length, release):
    """Rise from the start, hold until the length is over, then die away."""
    t = TIME - start
    return np.clip(t / attack, 0, 1) * np.exp(-np.maximum(t - length, 0) / release)


def waver(rate):
    """Random levels, a new one every 1 / rate seconds, smoothed twice; rms of 1."""
    hold = int(SR / rate)
    steps = np.repeat(rng.standard_normal(N // hold + 1), hold)
    smooth = uniform_filter1d(uniform_filter1d(steps, hold), hold)
    return unit(smooth[:N])


def noise(side):
    """Stereo noise; side sets how much the two ears differ."""
    mid, difference = rng.standard_normal((2, N))
    return unit(mid + side * difference * np.array([[1], [-1]]))


def colour(x, points):
    """Causal filter with the given spectrum, so that attacks stay sharp."""
    size = next_fast_len(N + SR)
    size += size % 2
    hz, db = np.transpose(points)
    bins_hz = np.arange(size // 2 + 1) * SR / size
    log_gain = np.interp(np.log(bins_hz + 1), np.log(hz), np.log(undb(db)))
    # folding the cepstrum forward in time gives minimum phase: no sound before its cause
    cepstrum = irfft(log_gain)
    cepstrum[1:size // 2] *= 2
    cepstrum[size // 2 + 1:] = 0
    return irfft(rfft(x, size) * np.exp(rfft(cepstrum)))[..., :N]


def pan(db):
    """Left and right gains for a level difference; positive is left."""
    gains = undb(np.array([[.5], [-.5]]) * db)
    return gains / gains.mean(axis=0)


def unit(x):
    """Scale to an rms of 1."""
    return x / np.sqrt(np.mean(x ** 2))


def curves(table):
    """The columns of a table, joined by straight lines in time."""
    s, *columns = np.transpose(table)
    return [np.interp(TIME, s, c) for c in columns]


def undb(db):
    """Decibels to gain."""
    return 10 ** (np.asarray(db) / 20)


# Width of the stereo image: (time [s], share of the left-right difference kept [0-1])
WIDTH = [(3.2, 0.46), (3.4, 0), (3.95, 0.02), (4.1, 0), (5.7, 0), (5.9, 0.04), (7.4, 0.3), (7.9, 0.86)]


def scene():
    """All sources; the image narrows almost to a point during the first strokes and opens again."""
    left, right = paddle() + hull() + slaps() + bow() + drips() + ticks() + air()
    side = curves(WIDTH)[0] * (left - right) / 2
    narrowed = (left + right) / 2 + side * np.array([[1], [-1]])
    return narrowed + top_hiss()  # the top hiss keeps its own width


TOP_HZ = 15400


def record(dry):
    """A steep low-pass filter removes the highest treble."""
    low_pass = signal.ellip(8, .2, 70, TOP_HZ, fs=SR, output="sos")
    return signal.sosfilt(low_pass, dry)


dry = scene()
out = record(dry)
to_wav(out)
```